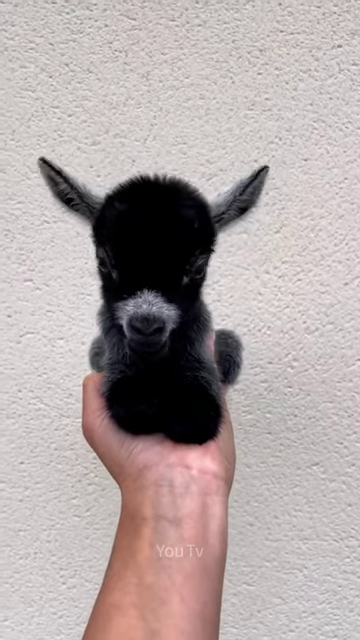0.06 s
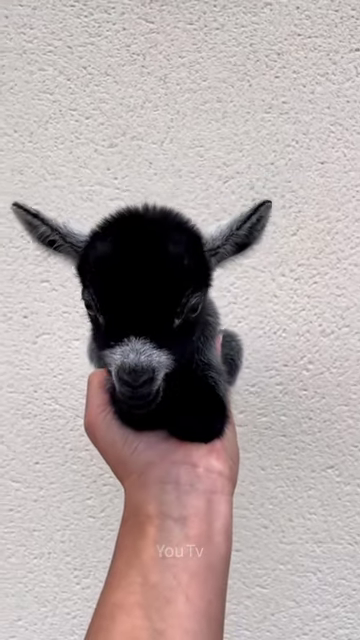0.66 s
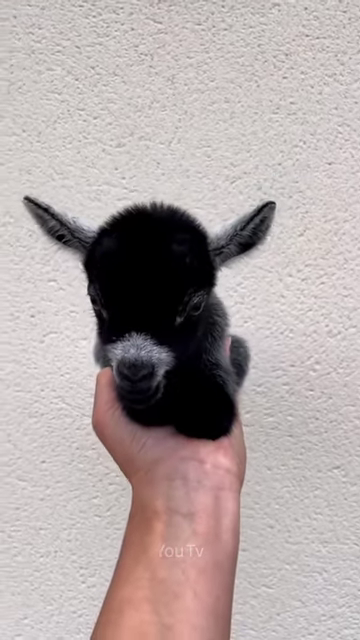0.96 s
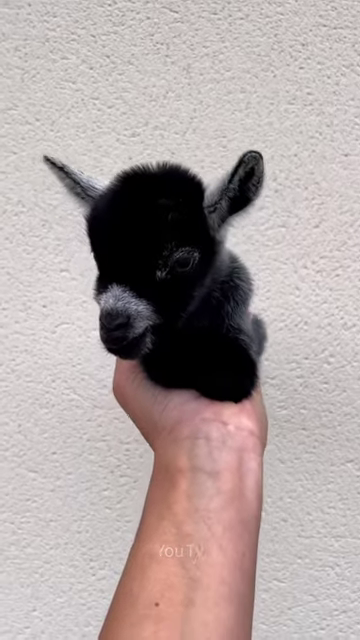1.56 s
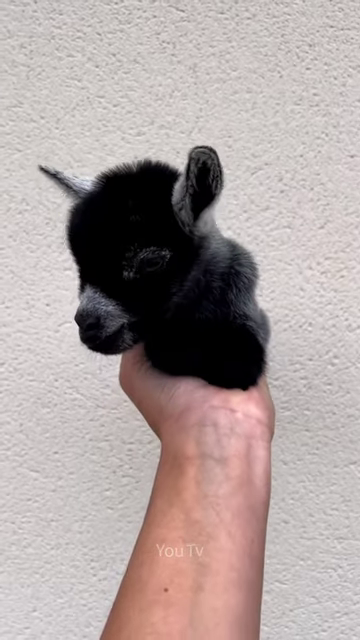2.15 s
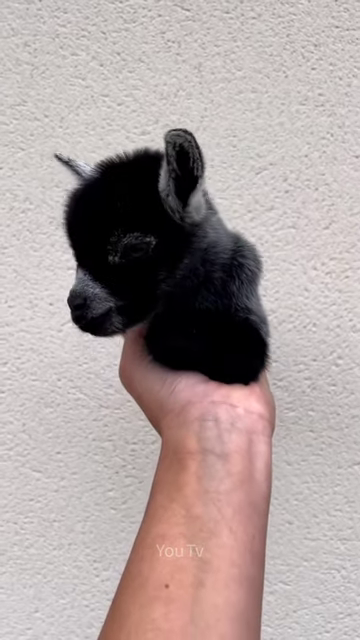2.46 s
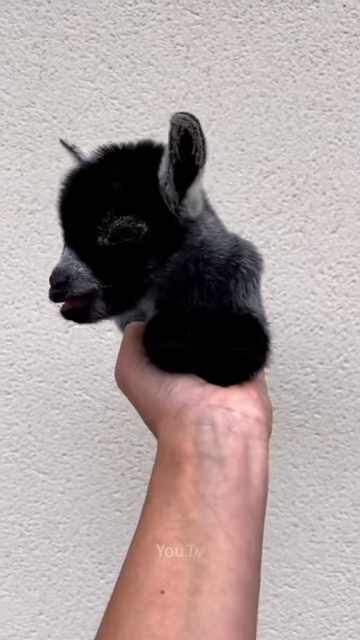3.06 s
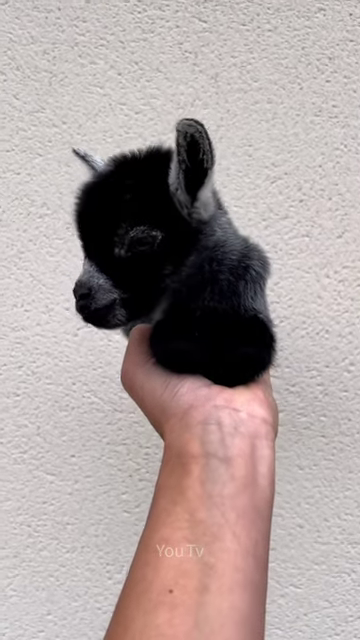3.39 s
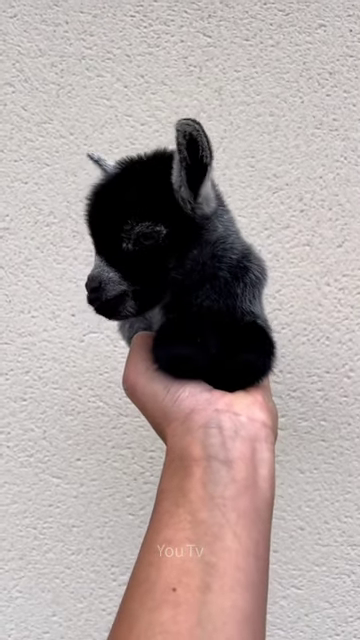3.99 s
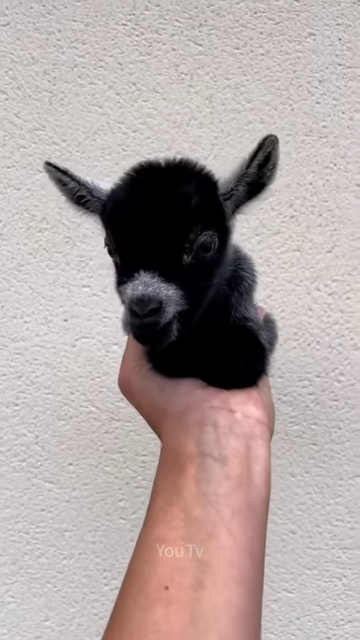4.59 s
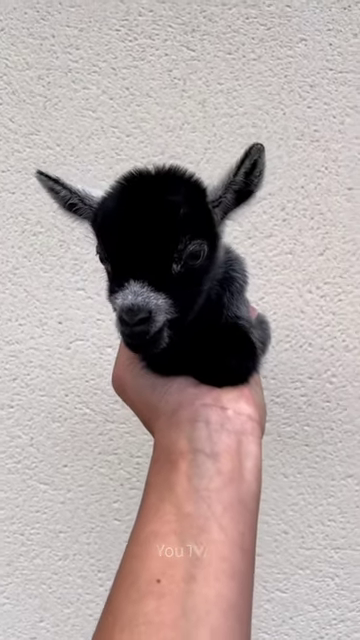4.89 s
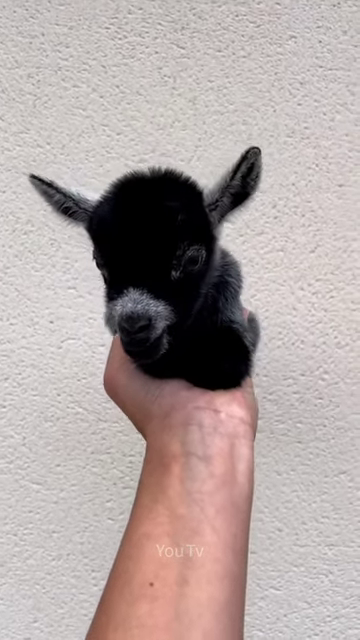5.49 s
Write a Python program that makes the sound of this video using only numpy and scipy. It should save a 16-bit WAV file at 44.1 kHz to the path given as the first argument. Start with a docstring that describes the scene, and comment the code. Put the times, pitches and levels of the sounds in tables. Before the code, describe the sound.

In a quiet yard, a young goat held near the microphone bleats three times, each high call wavering, turning raspy and sagging into a creak. After the first and third, a second kid farther away answers with a longer, softer nasal bleat and a breathy huff. A faint high hiss passes before the third call, while fingers rub and bump softly on the handheld microphone.

```python
"""A baby goat in a yard, held in one hand close to a phone microphone. It bleats: lips nearly shut, then a
bright rasp as the mouth opens, its vocal folds quavering with each push and sagging into a creak.
Another kid answers from farther off, through the echoes, and adds a husky breath. The near goat bleats
again, a faint high hiss passes, and a lip smack leads into the third bleat, which draws a second answer
and breath. Throughout, fingers rub and bump on the phone over faint outdoor air."""
import sys
import numpy as np
from scipy import signal
from scipy.fft import rfft, irfft, next_fast_len
from scipy.io import wavfile
from scipy.ndimage import uniform_filter1d, minimum_filter1d

SR = 44100
rng = np.random.default_rng(int(sys.argv[2]) if len(sys.argv) > 2 else 0)


def store_pcm(level_fs):
    """Save levels as 16-bit WAV."""
    pcm = np.round(np.clip(level_fs, -1, 1) * 32767).astype(np.int16)
    wavfile.write(sys.argv[1], SR, np.atleast_2d(pcm).T)


N = 253134
TIME = np.arange(N) / SR
# A goat's throat with the mouth wide open. Each row: frequency in Hz, gain in dB.
OPEN_THROAT = [(300, -37), (720, -21.5), (1000, -27), (1450, -8.5), (1750, -10), (2200, 0.5), (2500, -9),
               (2900, -14), (3300, -11.5), (4200, -18.5), (4800, -39.5)]


def near_goat():
    """The goat at the microphone: three bleats, whistles in the first and a lip smack before the last."""
    # Each row: start, mouth opening and end in seconds, starting pitch in Hz, first opening 0-1,
    # creak 0-1, shrillness in dB, throat ring in Hz, its gain in dB.
    bleats = [(0.219, 0.363, .596, 553, 0.18, 1, 5.5, 2774, 11),
              (2.543, 2.699, 3.024, 412.7, 0.17, 0.64, -0.5, 2880, -1),
              (3.934, 4.061, 4.295, 625.6, 0, 0.8, -3.5, 2480, 5)]
    # Upper throat resonances, one spectrum per bleat as the head turns. Each row: Hz, gain in dB.
    rasps = [
        [(4700, -27), (5800, -8), (6500, -1), (7300, -9), (8000, -2.5), (8700, -20.5)],
        [(4900, -24), (5800, -5), (6500, -2.5), (7200, -10.5), (7700, -22.5), (8700, -29.5)],
        [(5000, -38), (5700, -3.5), (6500, -2.5), (7300, 1.5), (8000, -3.5), (8700, -21)],
    ]
    shrills = [
        [(8000, -14), (9000, -4), (9600, 2.5), (10600, -1.5), (11400, -9), (12100, -27), (13000, -45)],
        [(8000, -10.5), (9000, -19), (9700, -7.5), (10600, -0.5), (11400, -9.5), (12100, -14.5), (13000, -33)],
        [(8000, -16), (9000, -1.5), (9700, -6.5), (10600, -2), (11400, 2), (12100, -15), (13000, -31)],
    ]
    # Each row: middle and length in seconds, pitch in Hz, relative level in dB.
    squeals = [(0.47, .04, 9430, -15.5), (.472, 0.029, 8500, -29.5)]
    mix = np.zeros(N)
    for row, rasp, shrill in zip(bleats, rasps, shrills):
        add(mix, *bleat(row, rasp, shrill))
    add(mix, *smack())
    for row in squeals:
        add(mix, *squeal(*row))
    return mix


def bleat(row, rasp, shrill, flutter_db=2, flutter_hz=44.4, fall_hz_per_s=3000, fade_s=.035):
    """The folds drive a throat that brightens as the mouth opens; each fall in pitch turns it gritty."""
    # Three spectra. Each row: frequency in Hz, gain in dB.
    shut_throat = [(300, -15.5), (600, -6), (1000, -7), (1300, -8.5), (2000, -8.5), (2600, -17),
                   (3200, -24.5), (4200, -23.5), (4800, -29)]  # lips nearly shut
    grit_colour = [(1200, -19), (1700, -10), (2300, -4.5), (2800, -4), (3400, 0), (4200, -3), (4700, -17.5)]  # the rattle of slack folds
    wheeze_colour = [(3400, -2.5), (4400, 1), (5400, 0.5), (6000, -5.5)]  # their thin wheeze all through a bleat
    *shape, ring_hz, ring_db = row
    hz, mouth, rough, voice_db, rasp_db, shrill_db, ends_db = bleat_gesture(*shape)
    count = len(hz)
    # a fast fall in pitch unsettles the folds
    falling = rounded(np.clip(-np.gradient(hz) * SR / fall_hz_per_s, 0, 1))
    pulses, puffs = folds(hz, rough + .047 + .025 * falling, jitter=.075, shimmer=.51, broken=.99)
    puffs = rattle(puffs, rough)
    hiss = evened(np.diff(np.diff(puffs, prepend=0), prepend=0))  # turbulence grows with frequency
    drive = blend(pulses, puffs, .5 * rough ** 2) + 7.5 * (rough + .16) * hiss
    ring = [(20, 0), (ring_hz / 1.18, 0), (ring_hz, ring_db), (ring_hz * 1.18, 0), (SR / 2, 0)]
    sound = gain_of(voice_db) * throat(colour(drive, ring), mouth, shut_throat, OPEN_THROAT)
    # grit rises with the rasp, the falling pitch and the creak
    grit_db = -47.5 + .43 * (rasp_db + 27.5) + 12 * falling + 6 * rough + .454 * ends_db
    sound += gain_of(grit_db) * np.sqrt(mouth + .05) * evened(colour(puffs, grit_colour))
    breathy = blend(pulses, puffs, .025 + .7 * rough + .42 * falling + .25 * (1 - mouth))
    wheeze_db = np.interp(mouth, [0, 1], (-57, -47)) + ends_db
    sound += gain_of(wheeze_db) * steadied(colour(breathy, wheeze_colour))
    for spectrum, db in ((rasp, rasp_db), (shrill, shrill_db)):
        # the treble shimmers irregularly as its comb drifts at random
        drift = 1.2 * wander(count, 14)
        combed = np.cos(drift) * scattered(breathy) + np.sin(drift) * scattered(breathy)
        flare_db = flutter_db * wander(count, flutter_hz)
        sound += gain_of(db + flare_db) * steadied(colour(combed, spectrum))
    fade = np.sin(np.pi / 2 * np.minimum(TIME[:count][::-1] / fade_s, 1)) ** 2
    return row[0], sound * fade * signal.windows.tukey(count, .05)


def bleat_gesture(start, opens, end, start_hz, ajar, creak, shrillness_db):
    """Each push lifts pitch and level; the mouth opens once; the last push sags into a creak and dies."""
    # Each row: crest in seconds, its pitch in Hz, voice, rasp and shrill top in dB, fall in seconds,
    # trough pitch in Hz, trough level in dB relative to the held level.
    pushes = [(.259, 674, -25, -38, -40, 0.05, 570, -1), (.373, 721, -19.5, -31, -24.5, 0.037, 579.8, 2.5),
              (.468, 724.3, -15.5, -25.5, -17.5, 0.069, 414, -4),
              (2.581, 604.5, -25, -42, -47, .045, 515, -2.5), (2.683, 725, -25, -38.5, -34, 0.052, 503, -4),
              (2.792, 744, -16.5, -25, -33.5, 0.047, 554.7, 0),
              (2.904, 722, -16.5, -24.5, -26.5, 0.046, 500.4, -1),
              (2.965, 517, -27.5, -43.5, -34, .025, 423, -4),
              (3.968, 711, -31.5, -44, -45, 0.047, 575.5, -0.5),
              (4.076, 728.5, -21.5, -32.5, -37, .042, 599.4, 1.5),
              (4.182, 709.6, -21, -26, -28, 0.07, 430, -0.5)]
    wide_open, opening_s = .85, .003
    clear_hz, creak_hz = 698.5, 453.6
    attack_s, release_s, onset_db = .061, .067, 3
    rough_lag_s, shrill_lag_s = .0028, .017
    crests, crest_hz, voice_db, rasp_db, shrill_db, fall, trough_hz, trough_db = within(pushes, start, end)
    t, slack = quaver(start, crests, crests + fall, end)
    push, trough = np.searchsorted((crests + fall)[:-1], t), np.searchsorted(crests, t)
    sag = np.sin(np.pi / 2 * slack ** .9) ** 2  # pitch swings in arches
    swell = (1 - slack) ** 1.49  # level crests are pointed
    hz = (1 - sag) * crest_hz[push] + sag * np.r_[start_hz, trough_hz][trough]
    mouth = ajar + (wide_open - ajar) * (1 + np.tanh((t - opens) / opening_s)) / 2
    # the creak comes in only at the bottom of a sag
    rough = .045 + creak * np.clip((clear_hz - hz) / (clear_hz - creak_hz), 0, 1) ** 2.6
    rough = np.clip(np.interp(t - rough_lag_s, t, rough), 0, 1)
    attack = np.maximum(1 - (t - start) / attack_s, 0) ** 2
    release = np.maximum(1 - (end - t) / release_s, 0) ** 1.3
    ends_db = -15 * attack - 30.5 * release  # the treble comes in after the voice and leaves first

    def level(crest_db, shut_db, open_db):
        """Swells to each crest from a held level set by the mouth."""
        held = np.interp(mouth, [0, 1], (shut_db, open_db)) + np.r_[onset_db, trough_db][trough]
        return rounded(swell * crest_db[push] + (1 - swell) * held)

    voice = level(voice_db, -43.5, -32.5) - 24.5 * release
    rasp = level(rasp_db, -57.5, -34) + ends_db
    shrill = level(shrill_db, shrillness_db - 51.5, shrillness_db - 33.5)
    shrill = np.interp(t - shrill_lag_s, t, shrill) + ends_db
    return hz, mouth, rough, voice, rasp, shrill, ends_db


def quaver(start, crests, troughs, end):
    """The times of a call and its slack: 1 at the start and in each trough, 0 on each crest."""
    t, turns = np.arange(start, end, 1 / SR), np.sort(np.r_[start, crests, troughs])
    return t, np.interp(t, turns, np.arange(len(turns)) % 2 == 0)


def folds(hz, rough, jitter, shimmer, broken, smear=.3, break_hz=(2100, 3800)):
    """Uneven pulses of the vocal folds, whose overtones break up, and the puff of air each lets through."""
    count = len(hz)
    tremor = broken * .005 * wander(count, 55)
    hz = hz * (1 + tremor + jitter * rough * wander(count, 300))
    turns, pulses = np.cumsum(hz) / SR, 0
    for k in range(1, 23):
        loose = broken * np.interp(k * hz, break_hz, [0, .38])
        flicker = 1 + loose * (wander(count, 70) + 1j * wander(count, 70))
        phase = 2 * np.pi * k * turns - smear * k ** 2  # upper harmonics lag, spreading each pulse
        pulses = pulses + (flicker * np.exp(1j * phase)).real / np.sqrt(1 + 2 * loose ** 2)
    pulses = evened(pulses) * (1 + shimmer * rough * wander(count, 260))
    puffs = (.1 + np.exp(-(turns % 1) / 1.4)) * rng.standard_normal(count)
    return pulses, evened(puffs)


def rattle(puffs, rough, rate_hz=210):
    """Slack folds chop the air into slow, uneven bursts."""
    turns = np.cumsum(rate_hz * (1 + .35 * wander(len(puffs), 120))) / SR
    bursts = evened(np.exp(-(turns % 1) / .25))
    depth = np.clip(.8 * np.sqrt(rough), 0, 1)
    return evened(puffs * (1 - depth + depth * bursts))


def throat(drive, mouth, shut, opened):
    """The resonances cross over from shut to open with the mouth, at a steady level."""
    return steadied((1 - mouth) * evened(colour(drive, shut)) + mouth * evened(colour(drive, opened)))


def squeal(s, length, hz, db):
    """A thin whistle breaks out at the hardest push."""
    count = round(length * SR)
    turns = np.cumsum(hz + 30 * wander(count, 150)) / SR
    return s - length / 2, gain_of(db + 4) * np.hanning(count) * np.sin(2 * np.pi * turns)


def smack(s=3.922, db=-48, low_hz=1100, high_hz=2100, t60=.035):
    """The lips part with a small wet click."""
    t = TIME[:SR // 20]
    ring = np.sin(2 * np.pi * low_hz * t) + np.sin(2 * np.pi * high_hz * t)
    return s, gain_of(db - 60 * t / t60) * ring * (1 - np.exp(-t / .00069))


def far_kid():
    """The kid across the yard: two answers, each followed by a voiceless push."""
    # Each row: start and end in seconds, level of the opening hum in dB, its length in seconds.
    answers = [(0.749, 1.331, -38, 0.084), (4.287, 5.091, -40, 0.21)]
    # Each row: crest and rise in seconds, level in dB, ring in Hz, its dB over the breath, treble in dB.
    husks = [(1.99, .08, -40, 2080, -10, 1), (5.19, .08, -45.5, 2223, 1, -4)]
    mix = np.zeros(N)
    for row in answers:
        add(mix, *answer(*row))
    for row in husks:
        add(mix, *husk(*row))
    return mix


def answer(start, end, hum_db, hum_s, fade_s=.03):
    """A thinner bleat: a closed-lipped hum, then held nasal tones with a hoarse edge."""
    # This kid's voice, nearly shut and open, and its rasp. Each row: frequency in Hz, gain in dB.
    far_shut = [(400, -20), (600, 2), (1200, 13), (1800, -6), (2450, -11), (3100, -24), (4800, -30)]
    far_open = [(500, -11), (1150, -6.5), (1800, 7), (2400, -5), (3000, -1), (3500, -4.5), (4200, -8),
                (4800, -31)]
    far_rasp = [(4900, -17.5), (5600, 10), (6800, 2.5), (8000, 6.5), (9200, -9.5), (10500, -5.5),
                (13000, -17.5)]
    hz, mouth, rough, db, rasp_db, ring_hz, ring_db = answer_gesture(start, end)
    hz = hz * (1 + .008 * wander(len(hz), 35))
    pulses, puffs = folds(hz, rough, jitter=.11, shimmer=1.1, broken=1)
    drive = blend(pulses, puffs, rough ** 1.3)
    voice = throat(scattered(drive, share=.25), mouth, far_shut, far_open)
    breath = steadied(colour(scattered(puffs), OPEN_THROAT))
    voice = blend(voice, breath, .7 * rough ** 2)  # when hoarse, more air passes the open throat
    ring = steadied(resonate(drive, ring_hz, width_hz=110)) * gain_of(ring_db)
    rasp = steadied(colour(scattered(drive), far_rasp)) * gain_of(rasp_db)
    lips_shut = np.sin(np.pi * np.minimum(TIME[:len(hz)] / hum_s, 1))
    hum = gain_of(hum_db) * lips_shut * np.sin(2 * np.pi * np.cumsum(hz) / SR)
    fade = signal.windows.tukey(len(hz), 2 * fade_s / (end - start))
    return start, (gain_of(db) * (voice + ring + rasp) + hum) * fade


def answer_gesture(start, end, sag=.12, dip_db=-10.5, rasp_dip_db=-16):
    """The farther kid holds its pitch on each push; pitch, level and rasp dip in between."""
    # Each row: crest in seconds, pitch in Hz, mouth opening 0-1, hoarseness 0-1, level in dB,
    # rasp in dB relative to the voice, nasal ring in Hz, its dB relative to the voice.
    pushes = [(.855, 595, 0.28, 0.09, -42.5, -10, 2930, -18),
              (.985, 605.3, 0.33, 0.26, -39.5, -4.5, 4250, -11),
              (1.11, 593.4, 0.72, 0.19, -40.5, -3, 2920, -8), (1.24, 572, 0.67, 0.07, -39, -10, 2820, -5),
              (4.42, 611.4, 0.11, 0.05, -46, -5.5, 1790, -4),
              (4.55, 628.4, 0.26, 0.09, -38, -4, 2450, -7.5),
              (4.685, 612, 0.5, 0.13, -39.5, -7, 3024, -7.5),
              (4.822, 617.3, 0.62, 0.13, -40, -12.5, 3730, -16),
              (4.985, 674, 1, 0.32, -44.5, -15, 2750, -4.5)]
    crests, hz, mouth, rough, db, rasp_db, ring_hz, ring_db = within(pushes, start, end)
    troughs = crests[:-1] + .62 * np.diff(crests)
    t, slack = quaver(start, crests, np.r_[troughs, end], end)
    push = np.searchsorted(troughs, t)
    hz = rounded(hz[push]) * (1 - sag * rounded(slack ** 2.1))
    mouth, rough, db, rasp_db, ring_db = (
        np.interp(t, crests, column) for column in (mouth, rough, db, rasp_db, ring_db))
    rising = np.gradient(slack) < 0
    dip = rounded(slack ** np.where(rising, 2.66, .93))  # each push comes in quickly and dies slowly
    return (hz, mouth, rough, db + dip_db * dip, rasp_db + rasp_dip_db * dip,
            rounded(ring_hz[push]), ring_db + rasp_dip_db * dip / 2)


def husk(crest, rise_s, db, ring_hz, ring_db, treble_db, t60=.15, treble_hz=4500):
    """A push that finds no voice: air swells through the throat and dies away."""
    # The voiceless throat. Each row: frequency in Hz, gain in dB.
    husk_colour = [(700, -8), (930, -18.5), (1500, -8), (2230, -2.5), (2760, -9.5), (3960, -7.5),
                   (4720, -31), (7700, -19), (11000, -21.5)]
    t = TIME[:SR // 2]
    level = np.where(t < rise_s, np.sin(np.pi / 2 * t / rise_s) ** 2, gain_of(-60 * (t - rise_s) / t60))
    puffs = rattle(rng.standard_normal(len(t)), rough=.13)
    spectrum = [(hz, gain + treble_db * (hz > treble_hz)) for hz, gain in husk_colour]
    breath = evened(colour(puffs, spectrum))
    ring = evened(resonate(puffs, np.full(len(t), ring_hz), width_hz=400))
    return crest - rise_s, gain_of(db) * level * (breath + gain_of(ring_db) * ring)


def handling(rumble_db=-2, scuff_db=-10, firm_db=-44, slips_per_s=400):
    """The grip shifts on the phone: rumble, stick-slip scuffs that grow with a firm rub, and bumps."""
    # Spectra of the rubbing. Each row: frequency in Hz, gain in dB.
    rumble_colour = [(20, -29.5), (48, -2), (65, 0.5), (100, -4.5), (150, -15.5), (250, -43)]
    scuff_colour = [(70, -21.5), (140, 5), (280, -7.5), (700, -24.5), (1500, -34.5)]
    # Each row: start in seconds, relative level in dB, thud in Hz, trim of the tap in dB.
    bumps = [(0.619, -32.5, 148, 1), (0.702, -50.5, 150, 9.5), (0.966, -28, 191.3, 9),
             (0.983, -24.5, 176, -26), (1.037, -46, 110.4, 17.5), (1.113, -35.5, 171, 13),
             (1.152, -32.5, 100, 2.5), (1.227, -26, 98, -29), (1.249, -38, 148, 2), (1.406, -37, 254, -14),
             (1.45, -31, 132.4, -30), (1.534, -32, 222, -14), (4.127, -27.5, 185, -4),
             (4.372, -34, 284, -23), (4.388, -29.5, 124, -6), (4.416, -28, 250, -23),
             (4.704, -33, 181, -18), (4.866, -37, 140, -27), (5.491, -24, 92, -4), (5.608, -30.5, 105, -14),
             (5.703, -27.5, 67.4, -39)]
    db = rubbing() + 2.8 * wander(N, 14)
    rumble = pair(steadied(colour(rng.standard_normal((2, N)), rumble_colour), size=2000), spread=.23)
    slips = rng.standard_normal((2, N)) * (rng.random((2, N)) < slips_per_s / SR)
    scuff = pair(steadied(colour(slips, scuff_colour), size=2500), spread=.55)
    scuff *= gain_of(scuff_db + .73 * (db - firm_db))
    knocks = np.zeros(N)
    for row in bumps:
        add(knocks, *bump(*row))
    return gain_of(db) * (rumble * gain_of(rumble_db) + scuff) + knocks


def rubbing(grip_db=-52.5):
    """Level of the skin on the phone in dB: each rub swells and fades over the resting grip."""
    # Each row: middle and length in seconds, level in dB.
    rubs = [(0.06, 0.085, -48.5), (0.274, 0.21, -42.5), (0.645, 0.24, -40), (0.96, 0.23, -38),
            (1.18, 0.46, -39.5), (1.6, 1, -53), (2.15, 0.12, -51.5), (2.447, 0.22, -49), (3.1, 1, -51.5),
            (4.088, 0.46, -42.5), (4.416, 0.16, -40), (4.76, 0.43, -48.5), (5.735, 0.43, -44.5)]
    level = np.full(N, gain_of(grip_db))
    for s, length, db in rubs:
        add(level, s - length / 2, gain_of(db) * np.hanning(round(length * SR)))
    return 20 * np.log10(level)


def bump(s, db, thud_hz, tap_db, thud_t60=.046, tap_hz=430, tap_t60=.01):
    """A fingertip lands on the case: a short tap and a damped thud."""
    t = TIME[:SR // 6]
    thud = np.sin(2 * np.pi * thud_hz * t) * gain_of(-60 * t / thud_t60)
    tap = np.sin(2 * np.pi * tap_hz * t) * gain_of(tap_db - 60 * t / tap_t60)
    return s, gain_of(db + 6) * (thud + 2 * tap) * (1 - np.exp(-(t / .002) ** 2))


def chirr(s=3.47, length=.36, hz=6950, width_hz=950, db=-57, flutter_hz=48):
    """A faint, fluttering high hiss in the distance."""
    t = TIME[:round(length * SR)]
    phase = 2 * np.pi * hz * t
    band = wander(len(t), width_hz) * np.cos(phase) + wander(len(t), width_hz) * np.sin(phase)
    flutter = 1 + .99 * np.sin(2 * np.pi * flutter_hz * t)
    return s, gain_of(db) * band * np.hanning(len(t)) * flutter


def yard_echoes(near, far):
    """The wall throws the near goat back quickly; the yard rings longer, fed more by what is far off."""
    # Each row: frequency in Hz, time to fall 60 dB in seconds.
    wall_decay = [(300, 0.48), (2000, 0.11), (12000, 0.041)]
    yard_decay = [(2000, 0.51), (12000, .28)]
    wall = gain_of(-23) * reflections(near, wall_decay, spread=.5)
    return wall + reflections(gain_of(-34) * near + gain_of(-11) * far, yard_decay, spread=.2)


def reflections(x, decay, spread, taps_per_s=3000):
    """Scattered reflections, each band dying at its own speed."""
    count = SR // 2
    taps = rng.standard_normal((2, count)) * (rng.random((2, count)) < taps_per_s / SR)
    taps *= TIME[:count] > .003
    hz, t, bands = signal.stft(pair(taps, spread), SR, nperseg=256)
    tail = signal.istft(bands * gain_of(-60 * t / read(decay, hz)[:, None]), SR, nperseg=256)[1]
    return signal.fftconvolve(x[None], tail / np.linalg.norm(tail[0]), axes=1)[:, :N]


def scattered(x, share=.93, size=180):
    """Echoes within a few milliseconds comb the treble, so harmonics flare as they glide."""
    taps = rng.standard_normal(size) * (rng.random(size) < .2) * np.linspace(1, 0, size)
    return x + share * signal.fftconvolve(x, taps / np.linalg.norm(taps))[:len(x)]


def microphone_ports(x, side_db=-13, late_s=.0034):
    """A near source reaches the two ports with different level and phase, and once more from the side."""
    # Each row: frequency in Hz, then the value noted.
    balance = [(300, 4), (660, 6), (1200, 0)]  # left over right in dB
    lead = [(1700, 0), (2250, 0.54), (2700, 1.3), (3200, 2.1), (3900, 1.9), (4600, 1.6), (7200, 0.2)]  # lead of the left in radians
    sideways = [(1600, -20), (2600, -5.5), (6000, 3), (10000, -7), (12000, 0)]  # gain of the side arrival in dB
    hz = np.fft.rfftfreq(N, 1 / SR)
    lean = gain_of(read(balance, hz) / 2) * np.exp(.5j * read(lead, hz))
    side = gain_of(side_db + read(sideways, hz)) * np.exp(-2j * np.pi * hz * late_s)
    return irfft(rfft(x) * np.array([lean + side, 1 / lean - side]), N)


def air(db=-62):
    """Still outdoor air: a faint, even wash all round the microphone."""
    # Each row: frequency in Hz, relative noise density in dB.
    air_colour = [(60, -3), (500, -10.5), (1500, -19.5), (3000, -31.5), (4200, -31.5), (5000, -40.5),
                  (11000, -40.5), (12500, -55.5)]
    return gain_of(db) * pair(evened(colour(rng.standard_normal((2, N)), air_colour)), spread=.72)


def gain_of(db):
    """Decibels to amplitude."""
    return 10 ** (np.asarray(db) / 20)


def evened(x):
    """Scales to rms 1."""
    return x / np.sqrt(np.mean(x ** 2) + 1e-20)


def steadied(x, size=700):
    """Scales to a running rms of 1."""
    return x / np.sqrt(abs(uniform_filter1d(uniform_filter1d(x ** 2, size), size)) + 1e-12)


def rounded(curve):
    """Rounds the corners of a control curve."""
    return uniform_filter1d(curve, 400, mode="nearest")


def within(table, start, end):
    """The columns of the rows that fall inside a call."""
    return np.transpose([row for row in table if start < row[0] < end])


def read(points, hz):
    """Reads a table along a log-frequency axis."""
    f, value = np.transpose(points)
    return np.interp(np.log(hz + 1), np.log(np.sort(f) + 1), value)


def colour(x, points):
    """Causal filter with the given spectrum, falling steeply beyond its ends."""
    size = next_fast_len(x.shape[-1] + 4096)
    hz = abs(np.fft.fftfreq(size, 1 / SR)) + 1
    octaves_below = np.maximum(np.log2(points[0][0] / hz), 0)
    octaves_above = np.maximum(np.log2(hz / points[-1][0]), 0)
    db = np.maximum(read(points, hz) - 30 * octaves_below - 60 * octaves_above, -100)
    minimum_phase = np.exp(np.conj(signal.hilbert(np.log(gain_of(db)))))
    return np.fft.ifft(np.fft.fft(x, size) * minimum_phase).real[..., :x.shape[-1]]


def resonate(x, hz, width_hz):
    """Two resonances in series, each of gain 1, that follow the curve hz."""
    turn, pole = np.exp(2j * np.pi * np.cumsum(hz) / SR), np.exp(-np.pi * width_hz / SR)
    for _ in range(2):
        x = 2 * (turn * signal.lfilter([1 - pole], [1, -pole], x / turn + 1e-18)).real
    return x


def wander(count, hz):
    """Smooth random motion up to about hz, rms 1."""
    size = next_fast_len(count, True)
    f = np.fft.rfftfreq(size, 1 / SR)
    return evened(irfft(rfft(rng.standard_normal(size)) / (1 + (f / hz) ** 4), size)[:count])


def blend(a, b, share):
    """Equal-power mix with the given share of b."""
    share = np.clip(share, 0, 1)
    return np.sqrt(1 - share) * a + np.sqrt(share) * b


def pair(x, spread):
    """Left and right from two unrelated signals: a middle and a weaker side."""
    return np.array([x[0] + spread * x[1], x[0] - spread * x[1]])


def add(mix, s, sound):
    """Mixes a sound in at s seconds."""
    part = mix[max(round(s * SR), 0):][:len(sound)]
    part += sound[:len(part)]


def scene():
    """The goat at the microphone is almost dry; the farther kid comes with the echoes of the yard."""
    near, far = near_goat(), far_kid()
    add(far, *chirr())
    echoes = yard_echoes(near, far)
    return microphone_ports(near) + gain_of(-7.5) * far + echoes + handling() + air()


def record(dry, ceiling=.72, edge_hz=13050):
    """A fast limiter holds down the loudest peaks, then a low-pass cuts the highest treble."""
    peak = uniform_filter1d(-minimum_filter1d(-abs(dry).max(0), 128), 128)
    limited = dry / np.maximum(peak / ceiling, 1)
    lowpass = signal.firwin(511, edge_hz, window=("kaiser", 9), fs=SR)
    return signal.oaconvolve(limited, lowpass[None], "same")


dry = scene()
out = record(dry)
store_pcm(out)
```